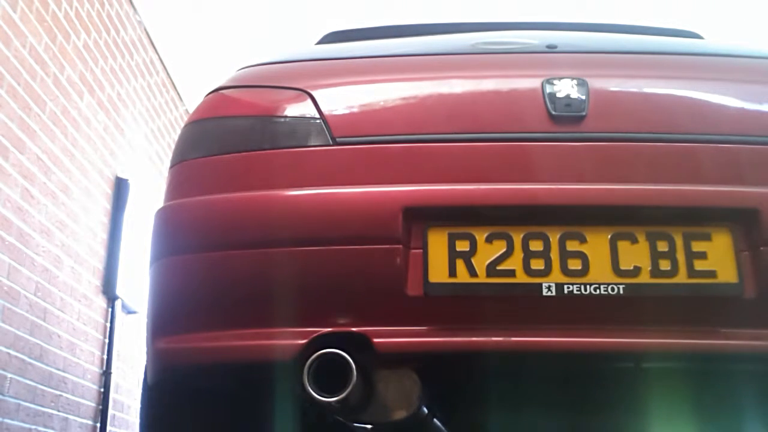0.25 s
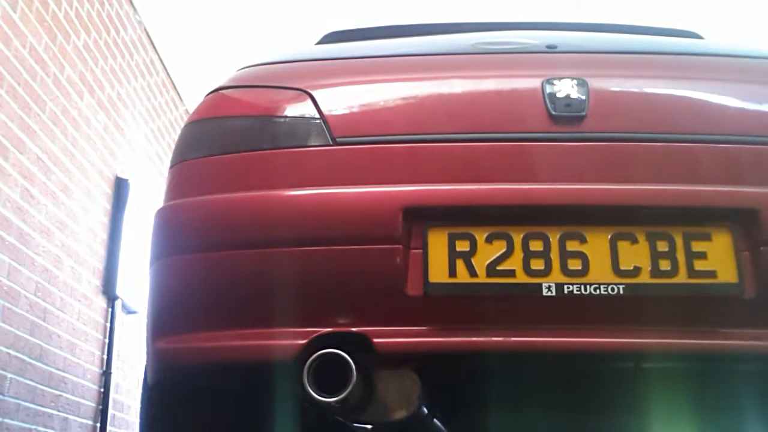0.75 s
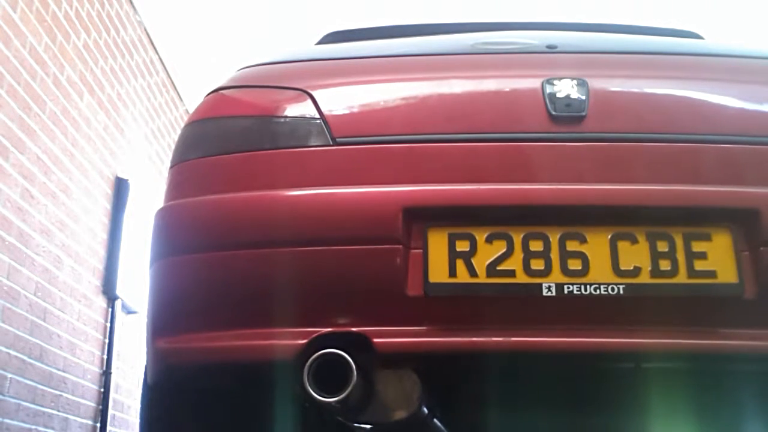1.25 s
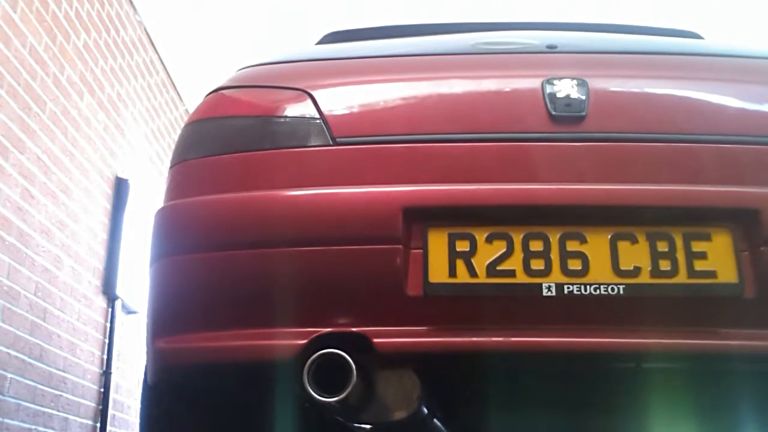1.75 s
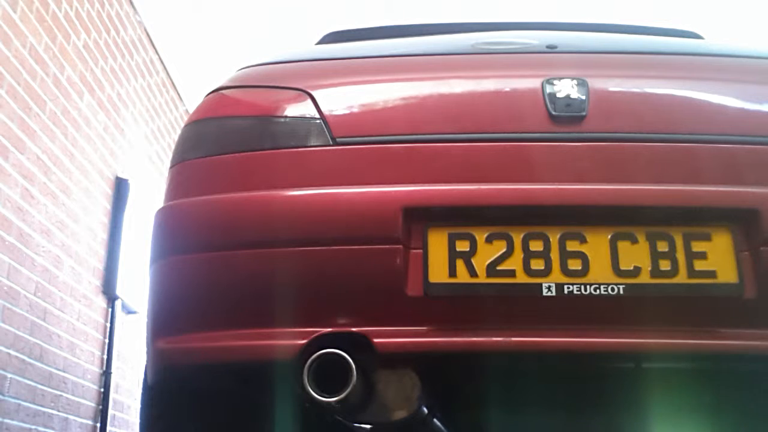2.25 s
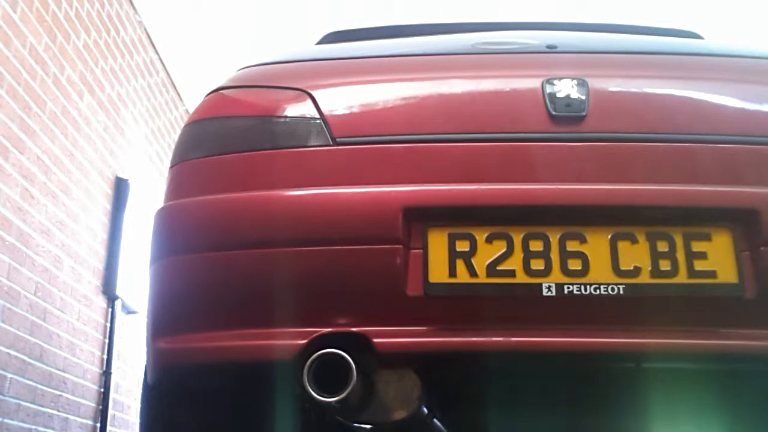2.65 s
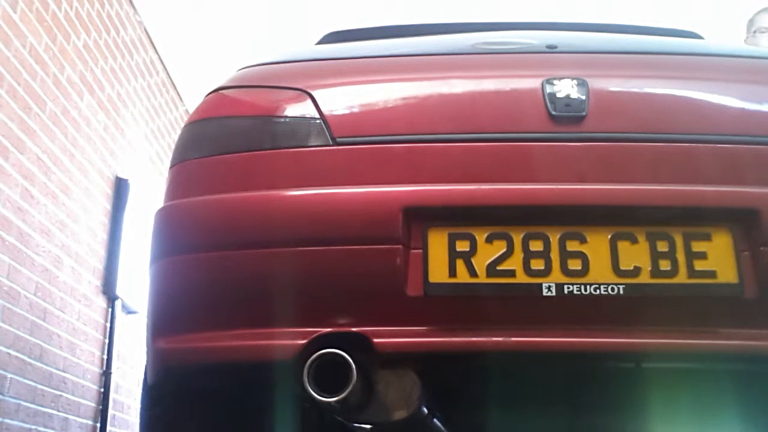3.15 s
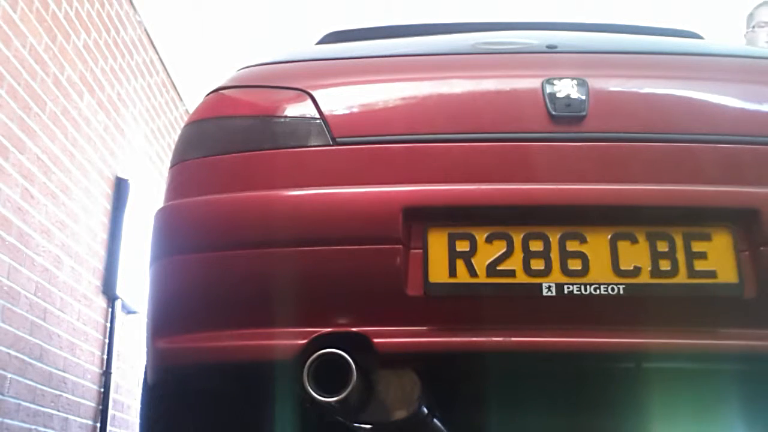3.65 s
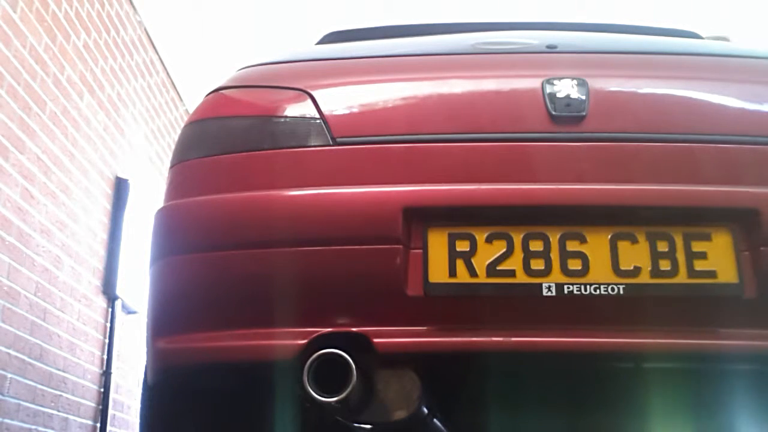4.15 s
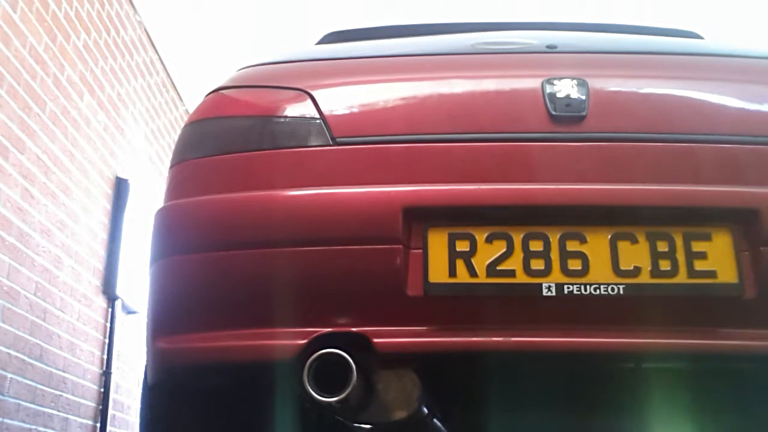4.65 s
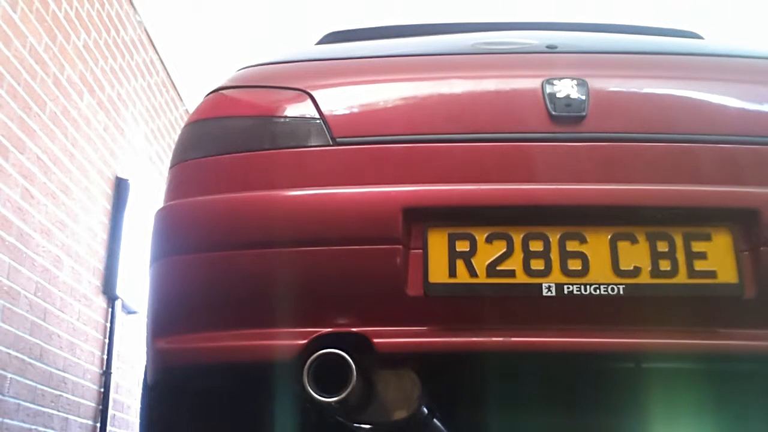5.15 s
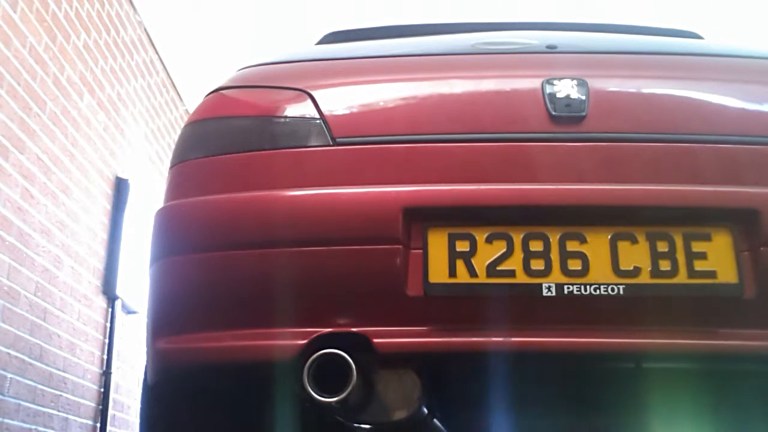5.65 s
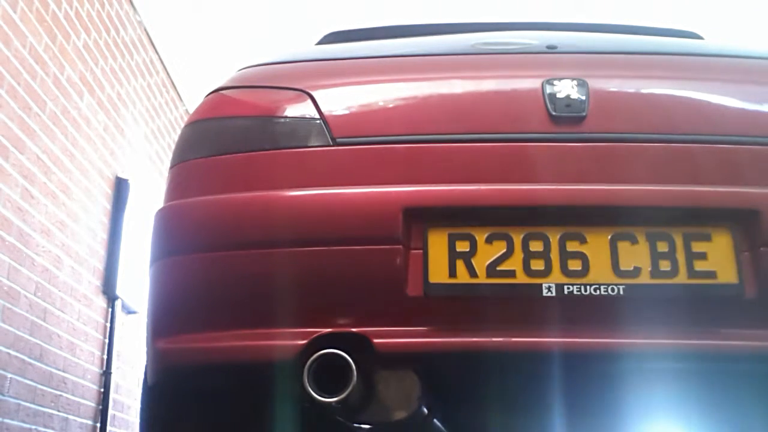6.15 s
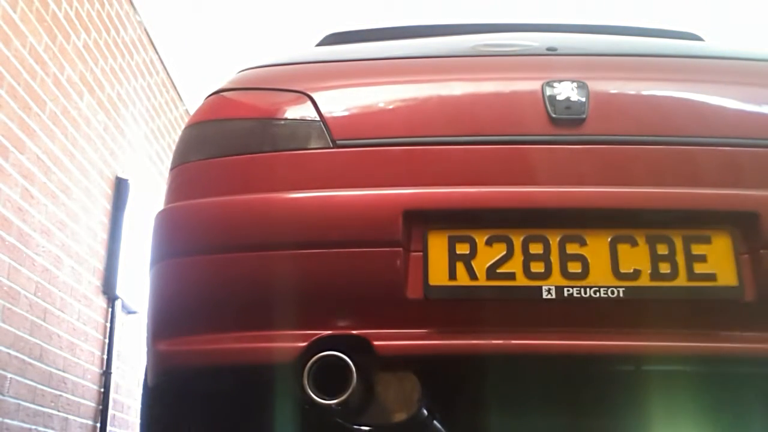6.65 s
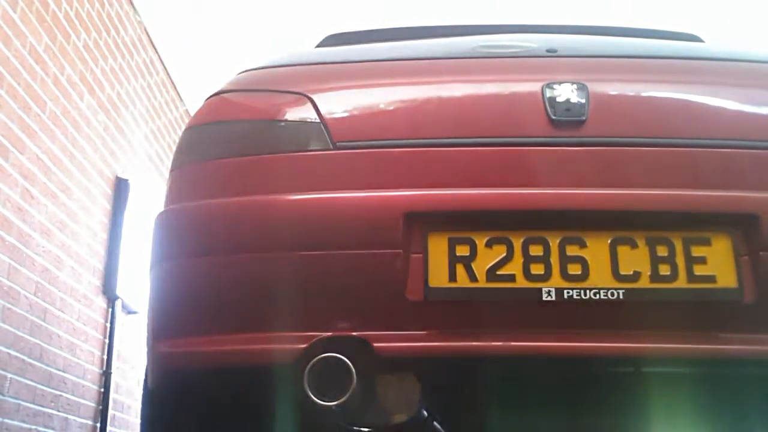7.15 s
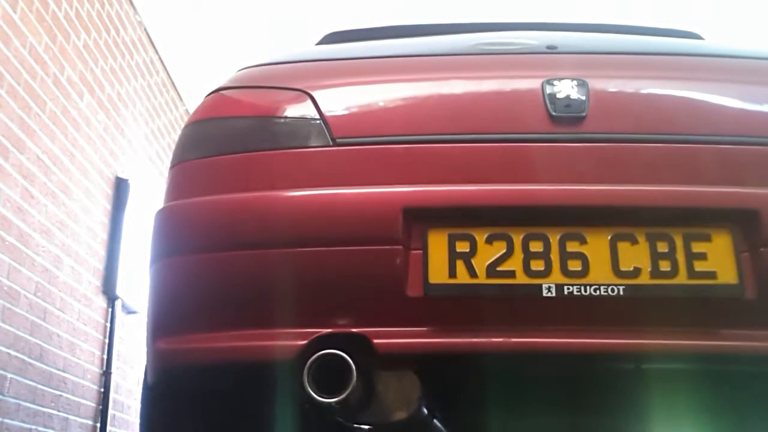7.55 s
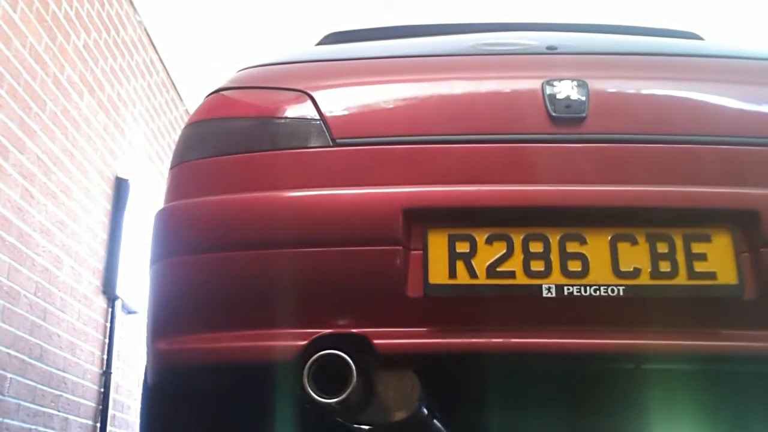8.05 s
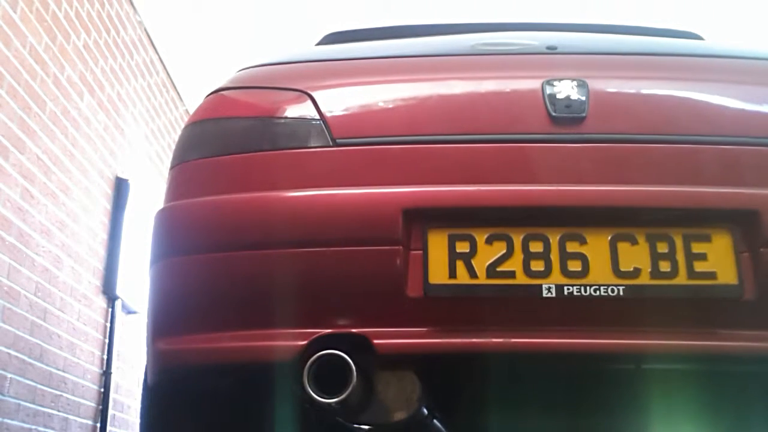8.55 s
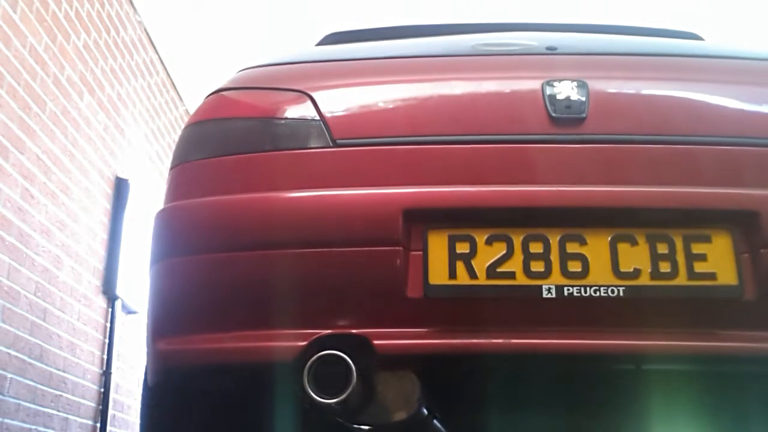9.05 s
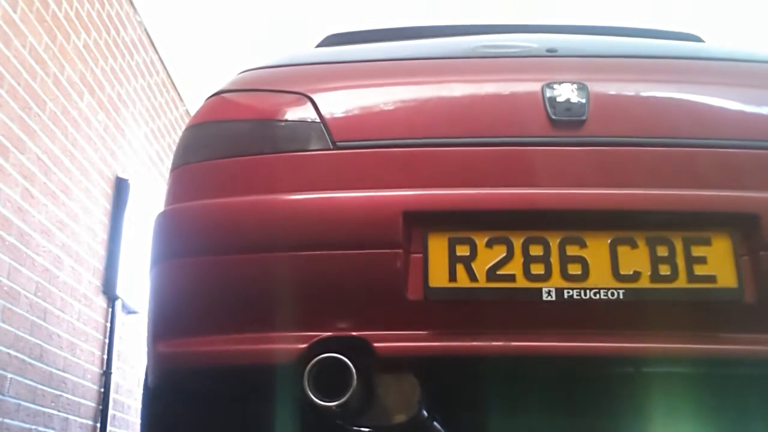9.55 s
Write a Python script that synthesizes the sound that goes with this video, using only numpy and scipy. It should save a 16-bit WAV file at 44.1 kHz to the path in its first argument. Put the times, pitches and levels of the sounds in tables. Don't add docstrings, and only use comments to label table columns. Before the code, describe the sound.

Outdoors beside a brick wall, microphone right behind the exhaust of a small car. The starter grinds and whines in pulses for about a second, the engine catches with heavy thumps, flares, dips and settles to a low throbbing idle with soft hiss. Then two sharp revs roar up and clip the microphone, the first falling with lumpy burble, airy hiss and rattles; the second is still high when it ends.

```python
import sys
import numpy as np
from scipy import signal
from scipy.fft import rfft, irfft, next_fast_len
from scipy.io import wavfile
from scipy.ndimage import uniform_filter1d

SR = 44100
rng = np.random.default_rng(int(sys.argv[2]) if len(sys.argv) > 2 else 0)


def inscribe(sig):
    pcm = np.round(np.clip(np.atleast_2d(sig).T, -1, 1) * 32767)
    wavfile.write(sys.argv[1], SR, pcm.astype(np.int16))


def gain_from_db(level_db):
    decades = np.asarray(level_db, float) / 20
    return 10 ** decades


N = 432621
IDLE_HZ, CATCH_S = 29.3, 1.08


def engine():
    t = np.arange(N) / SR
    hz = firing_rate()
    pull, snap, shut = throttle()
    coast = (1 - pull) * np.clip(hz / IDLE_HZ / 2 - 1, 0, 1)
    cold = spell(0, 2.54, .01, .08)
    duck = fading([s + length for s, length, *_ in SURGES], 0.018)
    hard = 1.03 * snap
    half, quarter, lag = unevenness(hz, pull, coast)
    pulses, jet = firings(hz, half, quarter, 0.33 * lag)
    fronts, _ = firings(hz, half, quarter, lag)
    rasp_db = -6 + 3 * pull - 4 * coast + 4 * snap
    pipe = pipe_tone(pulses, hz, pull, duck, hard)
    bark = pipe_bark(fronts, hz, pull, snap, cold, duck, hard, rasp_db)
    rasp = level(steep(ports(lambda n: n, shared=0.11), 420, 2520)) * np.roll(jet, 150) * gain_from_db(rasp_db)
    rush = np.maximum(shut ** 2, 1.2 * np.maximum(pull, snap))
    bay = engine_bay(hz, rush)
    hiss = (bay * gain_from_db(0.21 * walk(16.5)) + rasp) * gain_from_db(hiss_level(hz, pull, shut, cold, duck) + 5.5)
    running = np.clip((t - CATCH_S) / 0.038, 0, 1)
    return running * (pipe + bark + wall(pipe, bark)) + hiss * np.clip((t - .9) / 0.09, 0, 1)


# time in seconds, firing rate in Hz.
SPEED = [(1.08, 37.26), (1.25, 47.1), (1.5, 50.4), (1.8, 48.97), (2.2, 41.03), (2.8, 27), (3.2, 29.38),
         (6.59, 29.3), (6.71, 42), (6.86, 73.04), (7.24, 185.4), (7.38, 206.2), (8.25, 132.1),
         (8.98, 86.83), (9.12, 118.3), (9.43, 209.2), (9.62, 243.4), (9.81, 231.7)]


def firing_rate():
    t = np.arange(N) / SR
    hunting = 0.00613 * walk(3.0) * (t > 2.6) * (t < 6.6)
    return uniform_filter1d(columns(SPEED)[0], size=int(.07 * SR)) * (1 + hunting)


# start in seconds, end in seconds.
THROTTLE = [
    (6.67, 7.39),
    (8.962, 9.68),
]


def throttle():
    pull = sum(spell(start, end, 0.021, 0.25) for start, end in THROTTLE)
    snap = fading([CATCH_S] + [start - .06 for start, end in THROTTLE], 0.19)
    shut = fading([end for start, end in THROTTLE], 1)
    return pull, snap, shut


# start in seconds, end in seconds, added every-other share (0-1),
# added one-in-four share (0-1), added lag in firings.
LUMPS = [
    (1.094, 1.25, 0.3, 0, .001),
    (2.076, 2.491, 0.16, 0.07, 0.0025),
    (7.434, 7.879, 0.93, 0.28, 0.067),
    (8.34, 9.016, 0.05, 0.12, 0.051),
    (9.534, 9.758, .15, 0.3, 0.036),
]


def unevenness(hz, pull, coast):
    half, quarter, late = sum(np.outer(more, spell(start, end, 0.06, .12)) for start, end, *more in LUMPS)
    half = half + 0.18 * np.sqrt(IDLE_HZ / hz)
    lag = 0.015 + (.009 - 0.015) * pull + (0.0058 - 0.015) * coast + late
    return half, quarter + 0.065, lag


def firings(hz, half, quarter, lag):
    turns = np.cumsum(hz) / SR + .3
    count = np.arange(np.ceil(turns[0]), turns[-1] - 1).astype(int)
    chance = rng.standard_normal((4000, 3))
    even = np.interp(count, turns, np.arange(N)).astype(int)
    late = lag[even] * (-1) ** count + .005 * chance[count, 0]
    at = np.interp(count + late, turns, np.arange(N))
    i = at.astype(int)
    size = 1 + half[i] * (-1) ** count + quarter[i] * np.cos(np.pi / 2 * count + .6)
    size = size * gain_from_db(1.3 * IDLE_HZ / hz[i] * chance[count, 1])
    pulses = np.zeros(N + 1)
    np.add.at(pulses, i, size * (1 - at + i))
    np.add.at(pulses, i + 1, size * (at - i))
    jet = np.exp(-(turns % 1) / 0.29) * gain_from_db(3 * chance[turns.astype(int), 2])
    return pulses[:N], level(jet)


# pitch in Hz, width in Hz, level in dB.
BOOM = [(50, 5.9, -40.5), (90.2, 12.4, 24)]
# pitch in Hz, width in Hz, level in dB.
BODY = [(151.5, 18, 2), (236.6, 30.5, -2.15), (288.8, 15.7, 3.5)]
# firing rate in Hz, boom level in dB, body level in dB.
ANSWER = [(26.6, -16.5, -16), (29.3, -10, -19.5), (34.8, -9, -18), (42, -14.5, -11.5), (46.6, -10, -21),
          (51.7, -11, -13.5), (59, -15, -12), (96, -12.5, -18), (99, -8.5, -15.5), (110, -30.5, -10),
          (118, -15, -15), (122, -37, -8.5), (158, -41.5, -10.5), (185, -27.5, -14), (240, -20, -11.5)]


def pipe_tone(pulses, hz, pull, duck, hard):
    rate, boom, body = np.transpose(ANSWER)
    boom_db = np.interp(hz, rate, boom) - 2.5 * pull + 0.72 * walk(5.4)
    body_db = np.interp(hz, rate, body) + 2 * pull - 8 * duck + 0.84 * walk(6)
    smeared = (1 - hard) * spread(pulses) + hard * pulses
    middle = ring(smeared, BODY[:2]) + IDLE_HZ / hz * ring(smeared, BODY[2:])
    boom = held(steep(ring(pulses, BOOM), 27, 111)) * gain_from_db(boom_db)
    body = -held(steep(middle, 103, 276.6)) * gain_from_db(body_db)
    return boom + body


# pitch in Hz, width in Hz, level in dB.
BARK = [(413, 61, 5.5), (511, 157, 3), (658, 242, 0), (795, 277, -3.5), (1058, 660, -12)]


def pipe_bark(fronts, hz, pull, snap, cold, duck, hard, rasp_db):
    octaves = np.log2(hz / IDLE_HZ)
    free_db = -34.5 + 5.5 * octaves + (2.5 + 6.5 * snap) * cold
    pull_db = -23 + 3 * octaves
    bark_db = (1 - pull) * free_db + pull * pull_db - 8 * duck + 0.92 * walk(13)
    rough = level((1 - hard) * spread(fronts) + gain_from_db(rasp_db) * fronts)
    rough += .45 * IDLE_HZ / hz * rng.standard_normal(N)
    return -held(steep(ring(rough, BARK), 274.4, 1300)) * gain_from_db(bark_db)


def spread(x, lags_s=(.0031, .0057, .0083), gain=0.5):
    size = next_fast_len(len(x))
    hz = np.arange(size // 2 + 1) * SR / size
    turn = np.exp(-2j * np.pi * hz * np.array(lags_s)[:, None])
    return irfft(rfft(x, size) * np.prod((turn - gain) / (1 - gain * turn), axis=0), size)[:len(x)]


def wall(pipe, bark):
    late_pipe, late_bark = np.roll(pipe, 120), np.roll(bark, 300)
    return np.array([late_pipe, -late_pipe]) * gain_from_db(-14.5) + np.array([late_bark, -late_bark]) * gain_from_db(-12.5)


def hiss_level(hz, pull, shut, cold, duck):
    t = np.arange(N) / SR
    octaves = np.log2(hz / IDLE_HZ)
    catch_db = 11.5 * np.exp(-np.maximum(t - CATCH_S, 0) / 0.2)
    free_db = -41.5 + 5.5 * octaves - 1.5 * cold + catch_db + 5.5 * shut
    surging = sum(spell(s, s + length, 0.0024, .002) for s, length, *_ in SURGES)
    return (1 - pull) * free_db + pull * (-36 + 2.5 * octaves) - 7 * duck - 1.5 * surging


# pitch in Hz, level in dB per Hz.
BAY = [(180, -38), (300, -12.5), (320, -11), (508, -7.5), (804, -17.5), (1270, -15.5), (1450, -19),
       (2270, -17), (3200, -23), (5510, -24.5), (12100, -49.5), (14100, -65), (15300, -80)]
# pitch in Hz, width in Hz, level in dB.
RINGS = [(1267, 30, 6), (2250, 150, 0.5), (2460, 60, -11.5), (3890, 72, -2), (4090, 85, 4), (4700, 50, -15)]


def engine_bay(hz, rush):
    bay = ports(lambda n: level(shaped(n, BAY)) + ring(np.roll(n, SR), RINGS) * gain_from_db(4))
    bay += ports(lambda n: ring(n, [(5540, 460, 0)])) * gain_from_db(-16.5) * np.clip(hz / 200, 0, 1)
    bay += ports(lambda n: steep(n, 5000, 14000)) * gain_from_db(-22.5) * rush
    return bay


# start in seconds, length in seconds, grind swell in dB, whine swell in dB.
STROKES = [
    (0.0, 0.052, 12.5, -2),
    (0.119, 0.17, 1.5, 3.5),
    (0.292, 0.14, 5, 9.5),
    (0.519, 0.081, 7, 7.5),
    (0.681, 0.069, 9, 1),
    (0.828, 0.093, 7.5, -4),
    (0.91, 0.018, 10, 16),
    (0.97, .015, 15, 14),
]
# pitch in Hz, level in dB per Hz.
STARTER = [(59, -18), (100, -10), (139, -13), (281, -1), (416, -4), (556, -4.5), (1010, -1.5), (1470, -8.5),
           (5190, -14.5), (12100, -40.5), (14000, -53.5)]
# pitch in Hz, width in Hz, level in dB.
GEARS = [(767, 53, 1), (1010, 30, -13), (1650, 240, -6.5), (2075, 37, -21.5), (3900, 180, -12.5)]
# pitch in Hz, level in dB.
HUM = [(113.0, -41.5), (172.3, -43)]


def starter():
    t = np.arange(N) / SR
    swell = np.array([spell(s - 0.014, s + length, 0.014, 0.079) for s, length, *_ in STROKES])
    strokes = np.array(STROKES)
    grind_db = -35.5 + (swell * strokes[:, [2]]).max(axis=0)
    whine_db = -44.5 + (swell * strokes[:, [3]]).max(axis=0)
    grind = ports(lambda n: level(shaped(n, STARTER)) + gain_from_db(9.5) * ring(n, GEARS))
    grind = grind * gain_from_db(grind_db + 6.5 + 2.4 * walk(60))
    whine_hz = 281.4 * (1 + 0.043 * walk(30))
    whine = np.sqrt(2) * np.sin(2 * np.pi * np.cumsum(whine_hz) / SR) * gain_from_db(whine_db + 5.5)
    hum = sum(np.sqrt(2) * gain_from_db(db) * np.sin(2 * np.pi * hz * t) for hz, db in HUM)
    return (grind + whine + hum) * np.clip((1.0 - t) / 0.071, 0, 1)


# start in seconds, peak in dB, crack level in dB, thump pitch in Hz.
PUFFS = [(0.331, -21, -34, 68), (0.509, -26.5, -25.5, 67), (0.677, -25, -33.5, 65), (0.825, -25, -16, 63.5),
         (0.92, 1.5, -19.5, 80.5), (0.966, -2, -18, 125), (1, 1.5, -16.5, 95), (1.033, -2.5, -54, 103),
         (1.054, -6.5, -39.5, 104), (1.097, 0, -18.5, 102.5), (8.088, -20.5, -46, 70.7)]


def puffs():
    click = np.zeros(SR // 8)
    click[0] = 1
    fade = np.roll(np.exp(-np.arange(len(click)) / SR / .011), 150)
    out = np.zeros((2, N + len(click)))
    for s, peak_db, crack_db, hz in PUFFS:
        i = int(s * SR)
        thump = -ring(click, [(hz, 0.17 * hz, 0), (1.86 * hz, 0.39 * hz, -8), (5.6 * hz, 200, -22)])
        thump = signal.lfilter(np.hanning(45), 1, thump)
        crack = level(steep(rng.standard_normal((2, len(click))), 550, 2600)) * fade
        out[:, i:i + len(click)] += gain_from_db(peak_db) * thump / np.abs(thump).max() + gain_from_db(crack_db) * crack
    return out[:, :N]


# start in seconds, end in seconds, pitch in Hz, width in Hz, level in dB.
RATTLES = [(0, 0.058, 2010, 206, -25), (0.233, 0.418, 1010, 42, -26.5), (0.285, 0.483, 213, 26.4, -27.5),
           (.55, 0.62, 580, 54, -32.5), (0.808, 0.888, 1650, 199, -27), (.93, 1.45, 6960, 3800, -45),
           (1.82, 2.192, 152.5, 5.2, -18), (2.36, 2.54, 149, 7, -16.5), (2.72, 3.28, 147, 4.3, -24.5),
           (8.42, 8.687, 799.7, 190, -24), (2.1, 2.568, 1900, 580, -49), (2.05, 2.55, 359, 41, -24),
           (4.398, 5.0, 4370, 2500, -54.5), (4.903, 5.5, 4470, 2500, -49.5),
           (5.995, 6.637, 4500, 2100, -50.5), (5.8, 6.287, 877, 81, -41.5), (6.2, 6.664, 892, 83, -43.5),
           (7.422, 8.057, 4750, 2600, -28), (7.459, 7.902, 5430, 350, -34), (7.242, 7.415, 1490, 1500, -34),
           (7.596, 7.78, 1216, 43, -40), (8.13, 8.267, 3170, 1900, -25), (8.237, 8.6, 1273, 65, -28.5),
           (9.655, 9.73, 2290, 220, -34.5)]


def rattles():
    out = np.zeros((2, N))
    for start, end, hz, width, db in RATTLES:
        i, j = int(start * SR), int(end * SR)
        noise = rng.standard_normal((3, 2 * SR // 3))
        both = noise[0] + 0.63 * noise[1:]
        band = level(ring(ring(both, [(hz, width, 0)]), [(hz, 2 * width, 0)]))[:, :j - i]
        out[:, i:j] += gain_from_db(db) * band * np.sqrt(np.hanning(j - i))
    return out


def level(x, db=0):
    return x * gain_from_db(db) / np.sqrt(np.mean(x ** 2))


def shaped(x, points, sign=1):
    hz, db = np.transpose(points)
    size = next_fast_len(len(x))
    axis = np.log(np.arange(size // 2 + 1) * SR / size + 1)
    return irfft(rfft(x, size) * gain_from_db(sign * np.interp(axis, np.log(hz), db)), size)[:len(x)]


def ring(x, modes):
    out = 0
    for k, (hz, width, db) in enumerate(modes):
        b, a = signal.iirpeak(hz, hz / width, SR)
        out = out + (-1) ** k * gain_from_db(db) * signal.lfilter(b, a, x)
    return out


def steep(x, lo_hz, hi_hz):
    return signal.sosfilt(signal.butter(2, [lo_hz, hi_hz], "bandpass", fs=SR, output="sos"), x)


def held(x, span_s=0.2):
    size = int(span_s * SR)
    power = uniform_filter1d(uniform_filter1d(x ** 2, size), size)
    return x / np.sqrt(power + 1e-12)


def walk(rate):
    size = int(SR / rate)
    steps = np.repeat(rng.standard_normal(N // size + 1), size)
    return uniform_filter1d(uniform_filter1d(steps, size), size)[:N]


def columns(table):
    s, *rest = np.transpose(table)
    return [np.interp(np.arange(N) / SR, s, c) for c in rest]


def ports(colour, shared=0.14):
    common, left, right = (level(colour(rng.standard_normal(N))) for _ in range(3))
    direct = np.array([np.roll(common, 17), common])
    return np.sqrt(shared) * direct + np.sqrt(1 - shared) * np.array([left, right])


def spell(start, end, rise, fall):
    t = np.arange(N) / SR
    return np.clip(np.minimum((t - start) / rise, (end - t) / fall + .5), 0, 1)


def fading(moments, fade_s):
    since = np.arange(N) / SR - np.array(moments)[:, None]
    return (np.exp(-np.abs(since) / fade_s) * (since > 0)).max(axis=0)


# pitch in Hz, left minus right in dB.
LEAN = [(60, -1), (110, 0), (200, 1), (380, 1), (690, 3.5), (1280, 3.5), (2360, 2), (4350, -1),
        (8030, -4.5), (14800, -2)]


def scene():
    dry = engine() + starter() + puffs() + rattles()
    half_lean = [(hz, db / 2) for hz, db in LEAN]
    return np.array([shaped(dry[0], half_lean), shaped(dry[1], half_lean, sign=-1)])


# start in seconds, length in seconds, drive in dB, first ceiling (0-1).
SURGES = [(6.876, .03, 11, .95), (7.046, .04, 13, .85), (7.113, .028, 13, .72), (7.196, .072, 11, .78),
          (7.409, .024, 13, .95), (9.073, .05, 13, .95), (9.16, .085, 11.5, .8), (9.288, .072, 11, .42),
          (9.372, .06, 11, .5), (9.48, .095, 12, .75), (9.777, .04, 13, 1)]


def overload(dry):
    t = np.arange(N) / SR
    sag, release_s, low = 0.37, 0.0055, 0.47
    drive_db, ceiling = np.zeros(N), np.full(N, .92)
    for s, length, db, top in SURGES:
        on = (t >= s) & (t < s + length)
        push = on * (1 - sag * (t - s) / length) + (1 - sag) * fading([s + length], release_s)
        drive_db = np.maximum(drive_db, db * push)
        on = (t >= s) & (t < s + length + 3 * release_s)
        ceiling[on] = low + (top - low) * np.exp(-(t[on] - s) / 0.061)
    driven = dry * gain_from_db(uniform_filter1d(drive_db, size=60))
    return np.clip(driven, -ceiling, ceiling) + 0.013 * (driven - uniform_filter1d(driven, size=20))


def band_limit(x):
    return signal.sosfilt(signal.butter(12, 15410, fs=SR, output="sos"), x)


def record(dry):
    low_pass = signal.ellip(8, .2, 60, 15400, fs=SR, output="sos")
    mix = np.clip(signal.sosfilt(low_pass, overload(dry)), -1, 1)
    return band_limit(mix)


dry = scene()
out = record(dry)
inscribe(out)
```